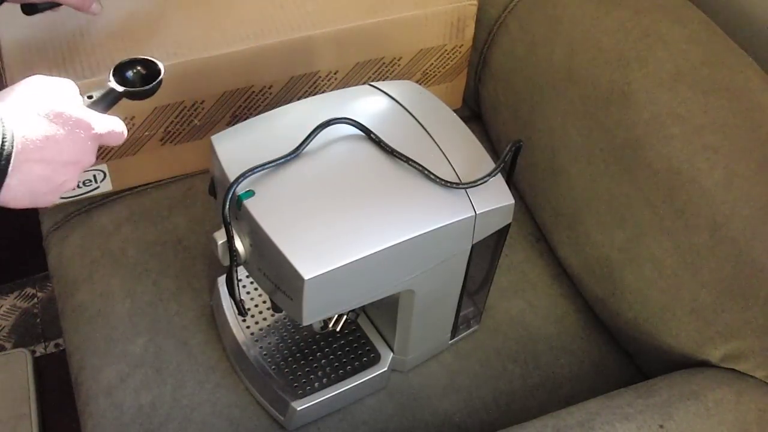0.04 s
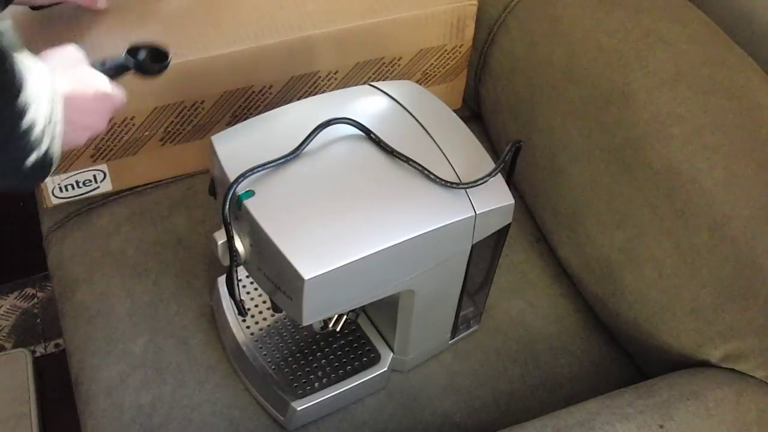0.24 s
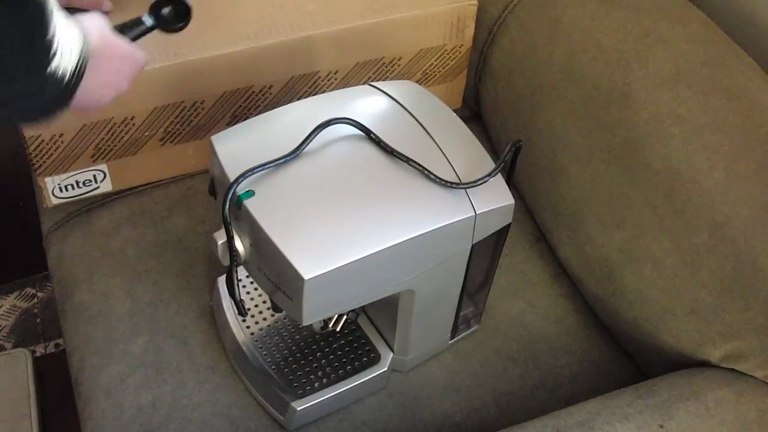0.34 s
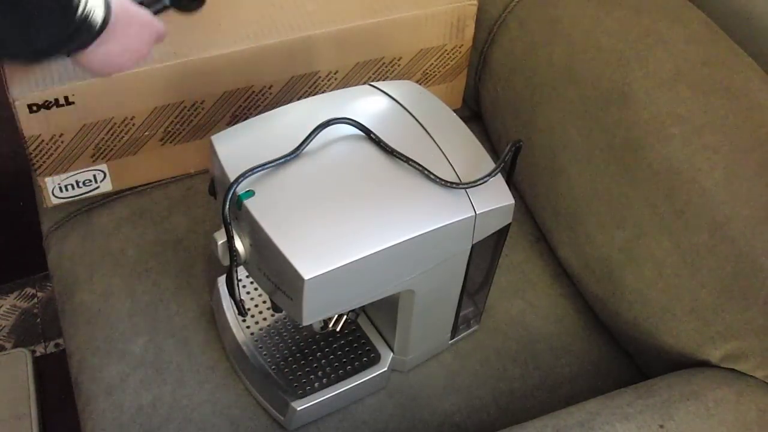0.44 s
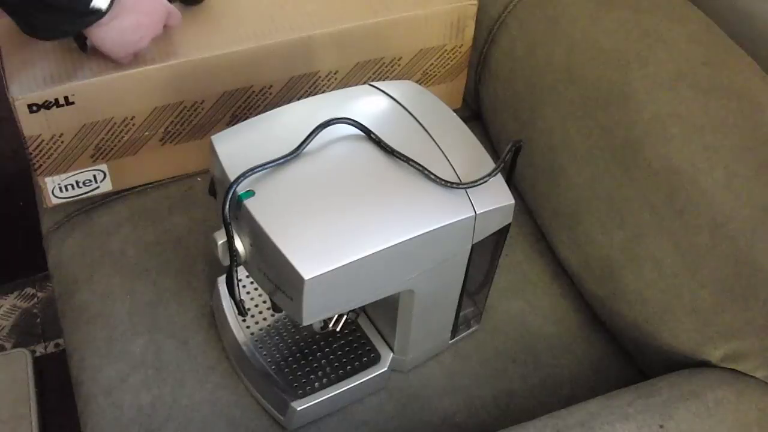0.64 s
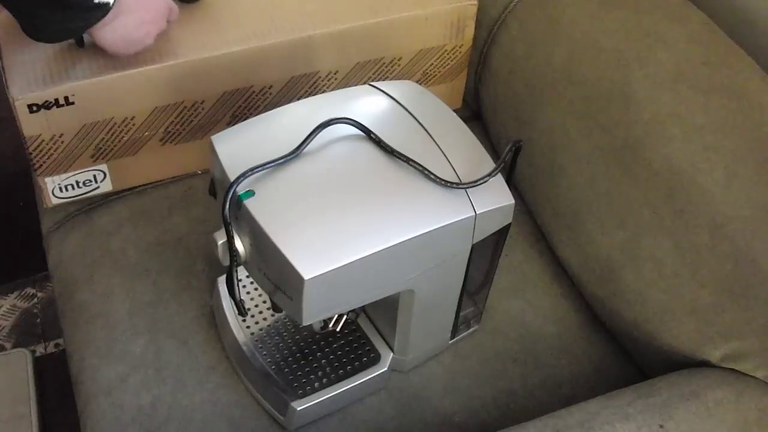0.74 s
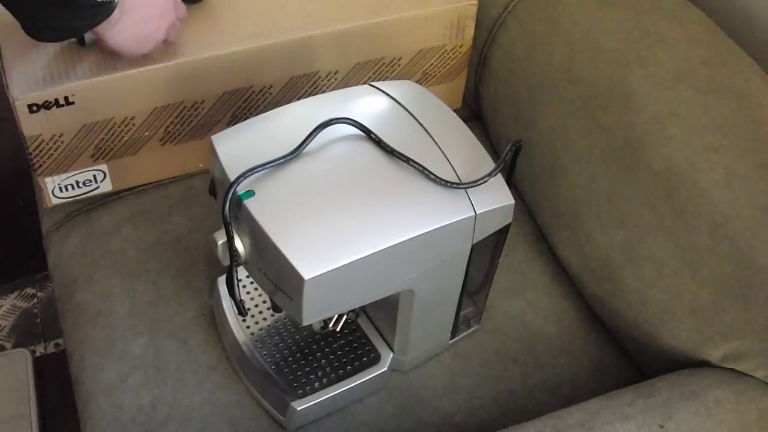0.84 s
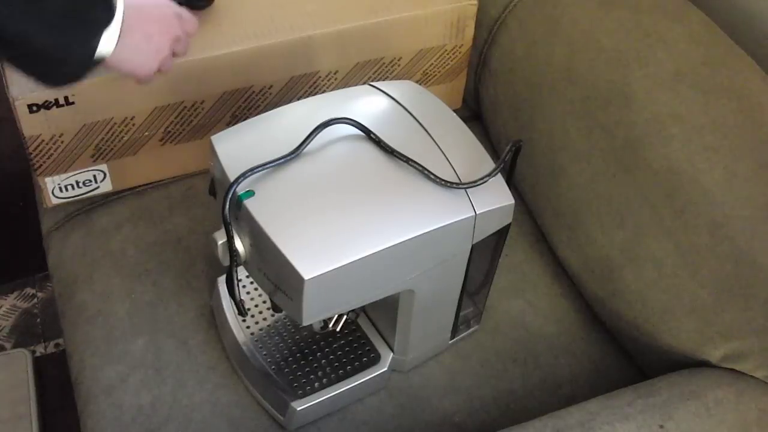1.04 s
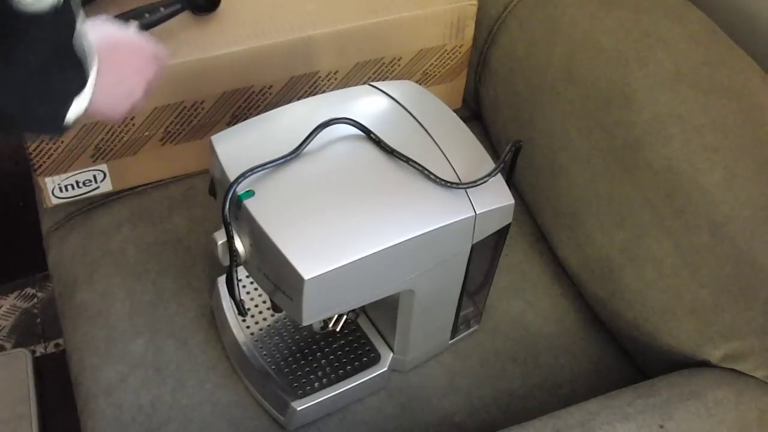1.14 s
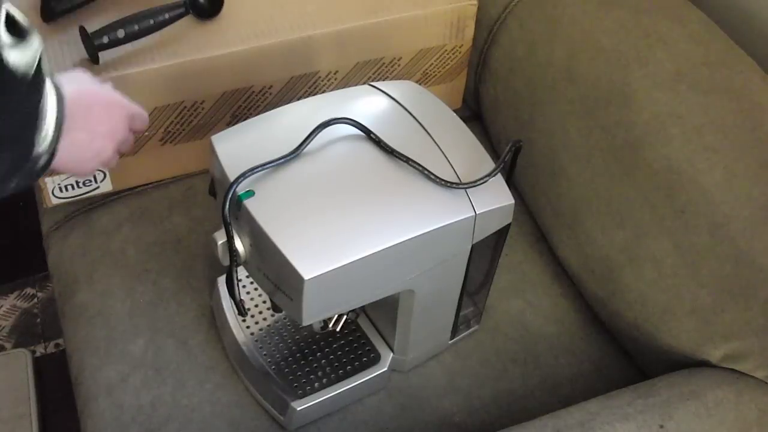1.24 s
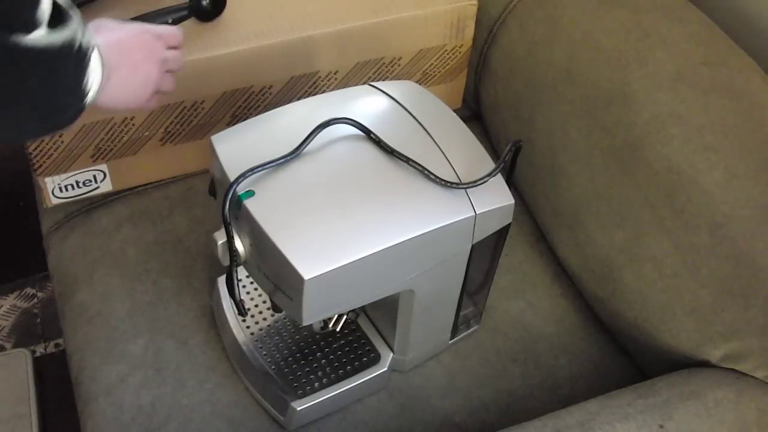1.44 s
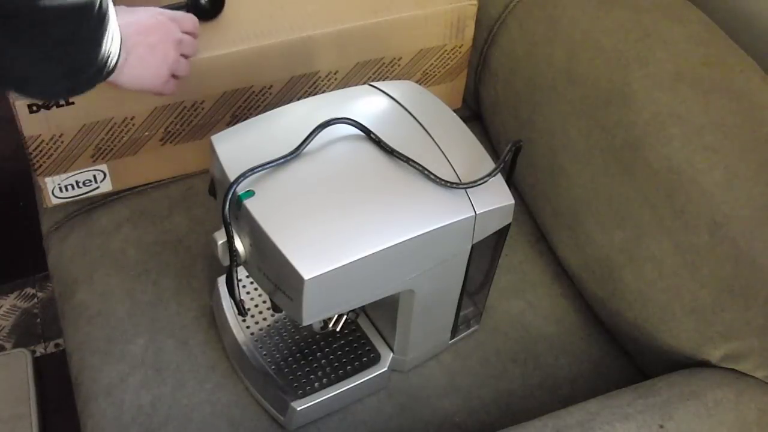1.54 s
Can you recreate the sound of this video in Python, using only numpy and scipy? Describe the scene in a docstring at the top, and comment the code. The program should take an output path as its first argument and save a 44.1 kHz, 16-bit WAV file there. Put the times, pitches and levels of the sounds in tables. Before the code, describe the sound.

A metal portafilter is set down on a big cardboard box with hollow bumps, steel clinks and one loud clunk. A hand slides off faintly, then a plastic scoop taps down lightly, in a small, quiet room.

```python
"""Hollow bumps on the lid of a big cardboard box: a metal portafilter is set down in a small room. Its hard
edges rap, its steel basket clinks in the holder, and it drops over with one loud clunk. The hand slides off,
then a plastic scoop is put down beside it with a few light taps and soft thumps on the lid. Hits are decaying
modes and noise with room reverb; the lid flexes under the load with a low rumble."""
import sys
import numpy as np
from scipy import signal
from scipy.fft import rfft, irfft
from scipy.io import wavfile

SR = 44100
rng = np.random.default_rng(int(sys.argv[2]) if len(sys.argv) > 2 else 0)


def to_wav(sig):
    """Store sig (one row per channel, or 1-D mono) as 16-bit WAV at the path in sys.argv[1].

    Samples outside -1..1 are clipped; the rate is SR.
    """
    pcm = np.clip(np.atleast_2d(sig), -1, 1) * 32767
    pcm = np.round(pcm).astype(np.int16)
    wavfile.write(sys.argv[1], SR, pcm.T)  # frames by channels


N = 70560
HIT_TIME_S = np.arange(SR * 3 // 5) / SR
CONTACT_S = 0.00074


BOX_MODES = [(120, -20, .17), (146, -19, .14), (222, -22, .16), (250, -18, .2), (324, -20, .15),
             (410, -23, .14), (475, -11, .14), (539, -21, .17), (604, -21, .22), (770, -20, .19),
             (880, -18, .15), (920, -18, .13), (1052, -20, .15)]  # pitch_hz, level_db, t60_s
BOX_ECHOES = [(.0067, -8), (0.0134, -11.5)]  # delay_s, level_db
CARDBOARD_SPECTRUM = [(40, -48), (120, 6), (300, -4), (600, -3.5), (1000, -5), (1400, -0.5), (3000, 3),
                      (16000, -38)]  # freq_hz, density_db
CARDBOARD_DECAY = [(50, 0.27), (200, 0.15), (1000, 0.11), (5000, 0.039)]  # freq_hz, t60_s
LID_KNOCKS = [(0.233, -18, 734, 80, -4.5, 121), (0.3179, -20, 606, 108, -25, 400),
              (0.3426, -18, 1160, 80, 9.5, 129), (0.3916, -19.5, 890, 85, -9, 400),
              (0.4029, -21.5, 1100, 71, 6.5, 994), (0.4134, -34, 1110, 91, 7, 121),
              (0.4275, -22.5, 1070, 593, 5.5, 800), (0.4938, -30.5, 454, 69.6, -31, 127),
              (0.6355, -11.5, 1077, 150, 7.5, 275.4), (0.6548, -15.5, 710, 179, -19, 460),
              (0.6860, -31.5, 1000, 246, 0.5, 595), (1.1271, -41.5, 222, 49.6, 1, 118),
              (1.142, -40.5, 524, 65, 5, 120), (1.214, -39, 335, 75, -6, 120)]  # start_s, level_db, top_hz, bottom_hz, ring_db, spot_hz; the rows from 1.127 s on are the scoop landing on the lid
def lid_knock(level_db, top_hz, bottom_hz, ring_db, spot_hz):
    """A soft blow pushes the lid, shakes the cardboard and rings the box, favouring modes near spot_hz."""
    ring = 0
    for k, (hz, mode_db, t60_s) in enumerate(BOX_MODES):
        spot_db = 12.5 * np.exp(-(np.log2(hz / spot_hz) / 0.29) ** 2)
        ring += (-1) ** k * gain(mode_db + spot_db) * mode(hz, t60_s)
    flutter = noise_tail(CARDBOARD_SPECTRUM, CARDBOARD_DECAY, rise_s=0.00053)
    pulse = np.sin(np.pi * np.minimum(HIT_TIME_S / CONTACT_S, 1))
    pulse /= pulse.sum()
    push = pulse.copy()
    for delay_s, echo_db in BOX_ECHOES:  # off the box walls
        add(push, delay_s, gain(echo_db) * pulse)
    blow = gain(ring_db - 31) * ring + gain(-4) * flutter + gain(3) * push
    blow = signal.sosfilt(signal.butter(3, top_hz, fs=SR, output="sos"), blow)
    blow = signal.sosfilt(signal.butter(3, bottom_hz, "high", fs=SR, output="sos"), blow)
    return gain(level_db) * blow * SR / (np.pi * top_hz)  # low-pass make-up gain


CLASH_SPECTRUM = [(300, 6.5), (1300, 1), (2200, 0.5), (4800, 0), (7100, -15), (9000, -7), (12200, -6.5),
                  (15500, -2.5)]  # freq_hz, density_db
def steel_spectrum(modes, peak_db=11, q=70):
    """Contact noise spectrum, raised around each steel mode."""
    freq_hz = np.linspace(0, SR / 2, num=2000)
    peaks = sum(gain(peak_db + mode_db / 2) ** 2 / (1 + (2 * q * (freq_hz / hz - 1)) ** 2)
                for hz, mode_db, _ in modes)
    return np.transpose([freq_hz, curve_at(CLASH_SPECTRUM, freq_hz) + 10 * np.log10(1 + peaks)])


STEEL_MODES = [(1985, -16, 7, .06), (2870, -8, -2, .11), (3250, 1, -14, .13), (3523, 0, -5, .3),
               (4367, -3, -4, .2), (4490, -2, -4, .14), (5523, -7, -12, .14), (7607, -3, -12, .16),
               (8800, 1, -5, .07), (9270, 1, 3, .19), (9828, -4, 4, .17), (10258, 6, 0, .12),
               (10865, 3, 1, .17), (11680, -7, -1, .1)]  # pitch_hz, rim_db, wall_db, t60_s
CLASH_DECAY = [(1500, 0.13), (5000, 0.1), (14000, 0.13)]  # freq_hz, t60_s
BASKET_CLINKS = [(0.4027, -17.5, 8.5, 5, 0.21), (0.4126, -2.5, -2, 4, 0.2), (0.4212, -14, -4, -8, 0),
                 (0.4265, -3.5, -15, -20, 0.48), (0.4350, -7, -26, -24, 0.14), (0.515, -.5, 0, -1.5, 0.89),
                 (0.649, -27.5, -1, 15.5, 0.077)]  # start_s, level_db, ring_db, treble_db, place (0 rim, 1 wall)
def basket_clink(level_db, ring_db, treble_db, place, shelf_hz=7100):
    """The steel basket hits its holder: snap, clash and beating mode pairs, weighted by place struck."""
    modes = [(hz, rim_db + place * (wall_db - rim_db), t60_s)
             for hz, rim_db, wall_db, t60_s in STEEL_MODES]
    strengths = gain(0.5 * rng.standard_normal(len(modes))) * rng.choice([-1, 1], len(modes))
    splits_hz = rng.uniform(-59.6, 53.6, len(modes))
    ring = 0
    for (hz, mode_db, t60_s), strength, split_hz in zip(modes, strengths, splits_hz):
        pair = mode(hz, t60_s) + gain(-7.5) * mode(hz + split_hz, t60_s)
        ring += strength * gain(mode_db) * pair
    spectrum = steel_spectrum(modes)
    snap = noise_burst(spectrum, decay_s=0.003)
    clash = noise_tail(spectrum, CLASH_DECAY, rise_s=0.00032)
    clink = gain(ring_db - 44.5) * ring + gain(-6) * clash + gain(-5) * snap
    low = signal.lfilter(*signal.butter(1, shelf_hz, fs=SR), clink)
    return gain(level_db) * (low + gain(treble_db) * (clink - low))


GRIP_MODES = [(994, -1, .075), (1137, -3.5, 0.083)]  # pitch_hz, level_db, t60_s
TICK_SPECTRUM = [(2000, 5), (15000, -10)]  # freq_hz, density_db
EDGE_RAPS = [(0.343, -29, -30.5), (0.401, -28.5, -26), (0.637, -40, -16)]  # start_s, grip_db, tick_db
def edge_rap(grip_db, tick_db):
    """A hard edge of the portafilter lands: a crisp tick and the hollow note of its grip."""
    tick = noise_burst(TICK_SPECTRUM, decay_s=0.0029)
    return gain(grip_db) * struck_modes(GRIP_MODES) + gain(tick_db) * tick


PLASTIC_SPECTRUM = [(600, 4.5), (950, 3), (1400, 5), (3000, 4.5), (5000, -4), (16000, -14)]  # freq_hz, density_db
PLASTIC_DECAY = [(2500, 0.051), (14000, 0.027)]  # freq_hz, t60_s
SCOOP_TAPS = [(1.127, -8), (1.1364, -30), (1.1429, -15), (1.534, -22)]  # start_s, level_db
def scoop_tap(level_db):
    """The scoop touches down: a plastic tick whose mids outlast its treble."""
    return gain(level_db) * noise_tail(PLASTIC_SPECTRUM, PLASTIC_DECAY, rise_s=0.0003) / 2


HANDLE_MODES = [(448, -3, 0.093), (592, 3, 0.053), (1040, -4, 0.051)]  # pitch_hz, level_db, t60_s
HANDLE_BOUNCES = [(1.2140, -39.5), (1.2262, -58)]  # start_s, level_db
def handle_bounce(level_db):
    """A soft bounce rings the scoop's hollow handle."""
    return gain(level_db) * struck_modes(HANDLE_MODES)


SKIN_SPECTRUM = [(1200, 8), (3000, -1.5), (7000, -11), (12000, -5.5), (16000, -11)]  # freq_hz, density_db
SLIDE_LEVELS = [(.68, -61), (.77, -54.5), (.83, -52.5), (.872, -52.5), (.89, -59)]  # time_s, level_db
def hand_slide():
    """Skin rubs with a faint hiss as the hand slides off."""
    return noise(SKIN_SPECTRUM, N) * envelope(SLIDE_LEVELS)


FLEX_SPECTRUM = [(15, -30), (35, -6.5), (85, -9), (140, -27), (600, -13.5), (4000, -85)]  # freq_hz, density_db
FLEX_LEVELS = [(.235, -61), (.265, -51), (.42, -40), (.52, -51), (.59, -49.5), (.65, -63), (1.08, -66.5),
               (1.125, -44.5), (1.19, -60), (1.35, -69)]  # time_s, level_db
def lid_flex():
    """The lid rumbles as it flexes under the load."""
    return noise(FLEX_SPECTRUM, N) * envelope(FLEX_LEVELS)


ROOM_SPECTRUM = [(50, -32), (200, 0), (4500, 2.5), (8000, -1.5), (16000, -6.5)]  # freq_hz, density_db
ROOM_DECAY = [(100, 0.41), (500, 0.45), (2000, 0.32), (5000, 0.39), (14000, 0.23)]  # freq_hz, t60_s
def in_room(source, hits, wet_db):
    """A table of hits, heard directly and as diffuse reflections of the small room."""
    direct = np.zeros(N)
    for start_s, *settings in hits:
        add(direct, start_s, source(*settings))
    response = noise_tail(ROOM_SPECTRUM, ROOM_DECAY, rise_s=0.015)
    return direct + gain(wet_db) * signal.fftconvolve(direct, response)[:N]


BACKGROUND_SPECTRUM = [(12, -32), (25, -2.5), (160, -5.5), (450, -12), (800, -16.5), (16000, -31.5)]  # freq_hz, density_db
def room_tone():
    """Faint, steady rumble and hiss."""
    return gain(-57) * noise(BACKGROUND_SPECTRUM, N)


def gain(db):
    """Decibels to amplitude."""
    return 10 ** (np.asarray(db) / 20)


def curve_at(points, hz):
    """Interpolates on a log-frequency axis."""
    freq_hz, values = np.transpose(points)
    return np.interp(np.log(hz + 1), np.log(freq_hz + 1), values)


def envelope(points):
    """Amplitude along a level curve, silent outside it."""
    time_s, level_db = np.transpose(points)
    return gain(np.interp(np.arange(N) / SR, time_s, level_db, left=-120, right=-120))


def add(mix, start_s, sound):
    """Mixes a sound in at start_s."""
    part = mix[round(start_s * SR):][:len(sound)]
    part += sound[:len(part)]


def unit_energy(sound):
    """Scales to energy 1."""
    return sound / np.sqrt(np.sum(sound ** 2) + 1e-20)


def noise(spectrum, size):
    """Coloured noise, rms 1."""
    shape = gain(curve_at(spectrum, np.fft.rfftfreq(size, 1 / SR)))
    bins = rfft(rng.standard_normal(size)) * shape
    return unit_energy(irfft(bins, size)) * np.sqrt(size)


def noise_burst(spectrum, decay_s):
    """Exponentially fading noise, energy 1."""
    return unit_energy(noise(spectrum, len(HIT_TIME_S)) * np.exp(-HIT_TIME_S / decay_s))


def noise_tail(spectrum, decay, rise_s):
    """Crowded resonances, each band dying at its own rate; energy 1."""
    hz, time_s, bands = signal.stft(noise(spectrum, len(HIT_TIME_S)), SR, nperseg=256)
    bands *= 1000.0 ** (-time_s / curve_at(decay, hz)[:, None])
    tail = signal.istft(bands, SR, nperseg=256)[1][:len(HIT_TIME_S)]
    return unit_energy(tail * (1 - np.exp(-HIT_TIME_S / rise_s)))


def mode(hz, t60_s):
    """One decaying resonance."""
    return np.cos(2 * np.pi * hz * HIT_TIME_S) * 1000.0 ** (-HIT_TIME_S / t60_s)


def struck_modes(modes):
    """Resonances that build up over the contact time."""
    ring = sum(gain(level_db) * mode(hz, t60_s) for hz, level_db, t60_s in modes)
    return ring * (1 - np.exp(-HIT_TIME_S / CONTACT_S))


def scene():
    """Portafilter, scoop and handling over the quiet room; mono."""
    knocks_and_clinks = in_room(lid_knock, LID_KNOCKS, wet_db=-13)
    knocks_and_clinks += in_room(edge_rap, EDGE_RAPS, wet_db=-13)
    knocks_and_clinks += in_room(basket_clink, BASKET_CLINKS, wet_db=-11)
    scoop = in_room(scoop_tap, SCOOP_TAPS, wet_db=-9)
    scoop += in_room(handle_bounce, HANDLE_BOUNCES, wet_db=-13)
    return (knocks_and_clinks + scoop + hand_slide() + lid_flex() + room_tone())[None]


def record(dry):
    """Steep low-pass at 15.8 kHz."""
    lowpass = signal.firwin(511, 15800, window=("kaiser", 9), fs=SR)
    return signal.oaconvolve(dry, lowpass[None], "same")


dry = scene()
out = record(dry)
to_wav(out)
```